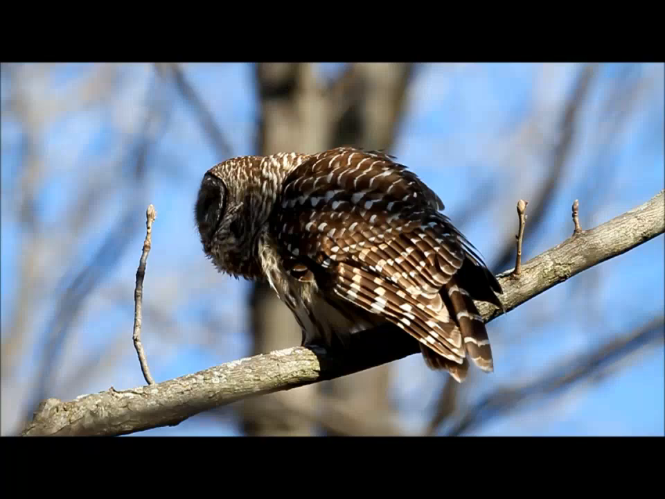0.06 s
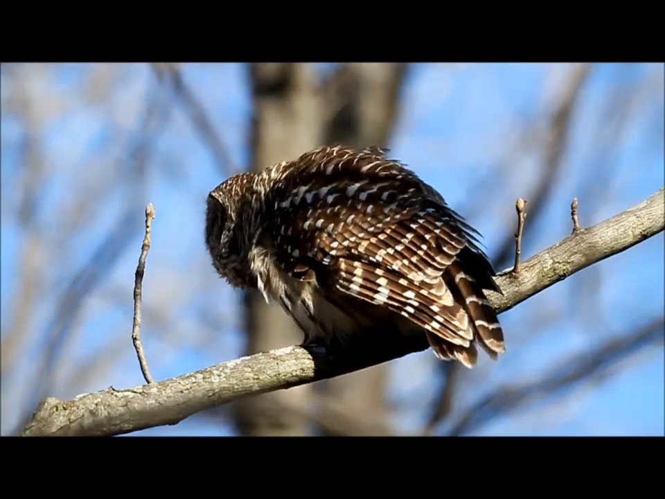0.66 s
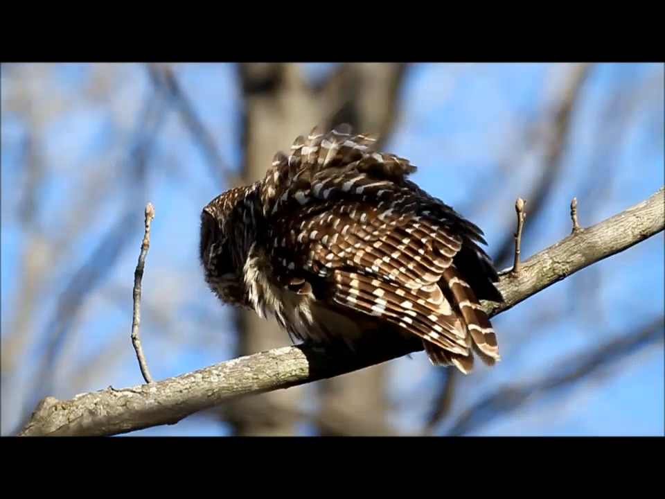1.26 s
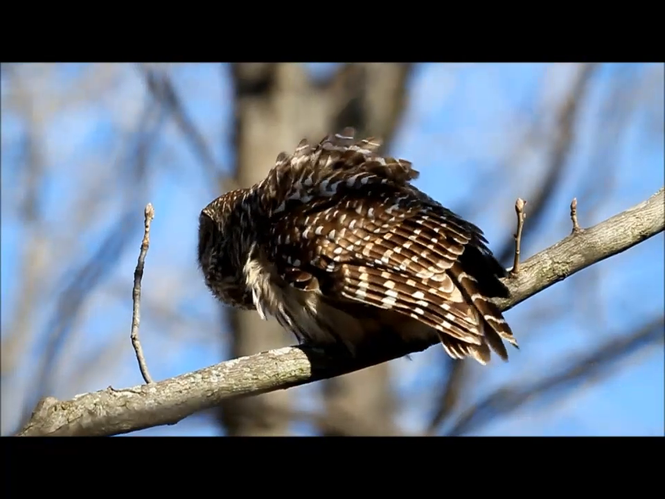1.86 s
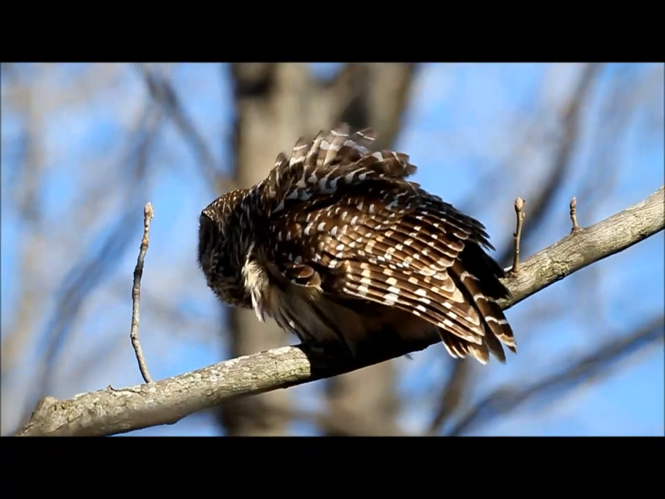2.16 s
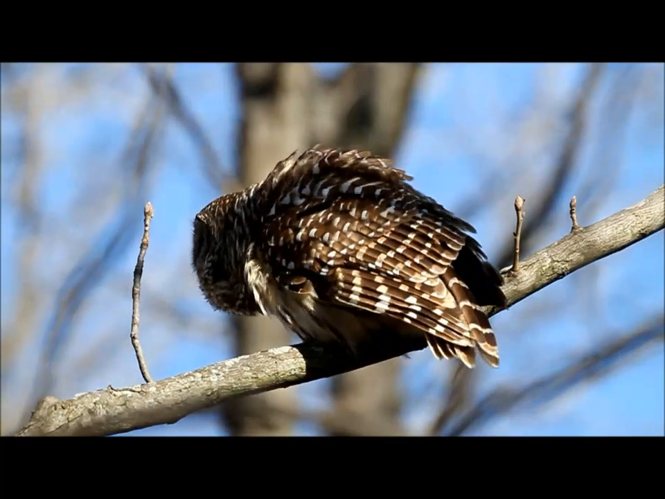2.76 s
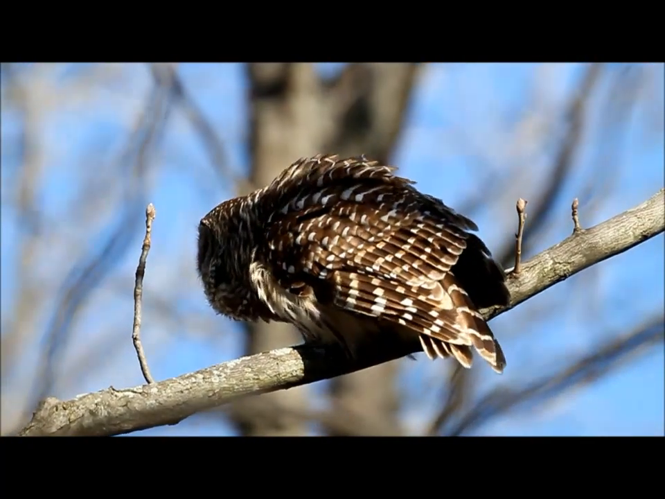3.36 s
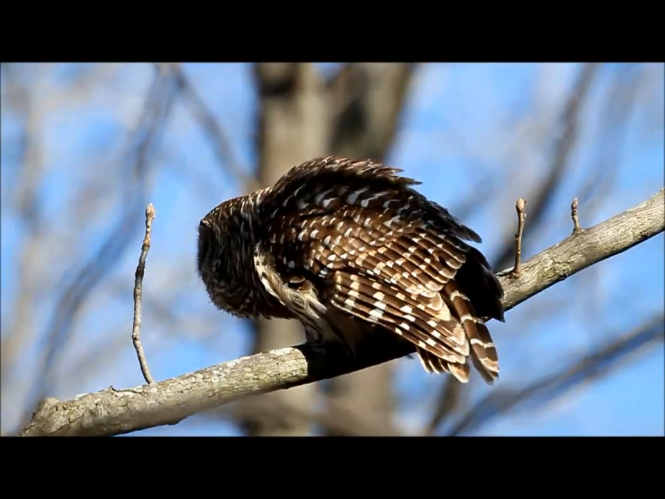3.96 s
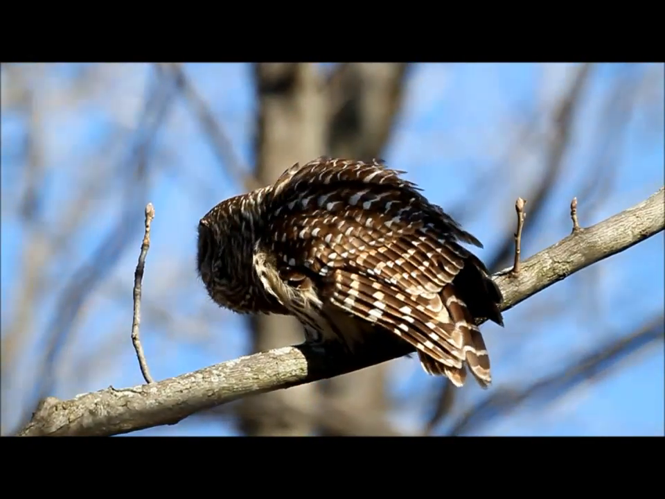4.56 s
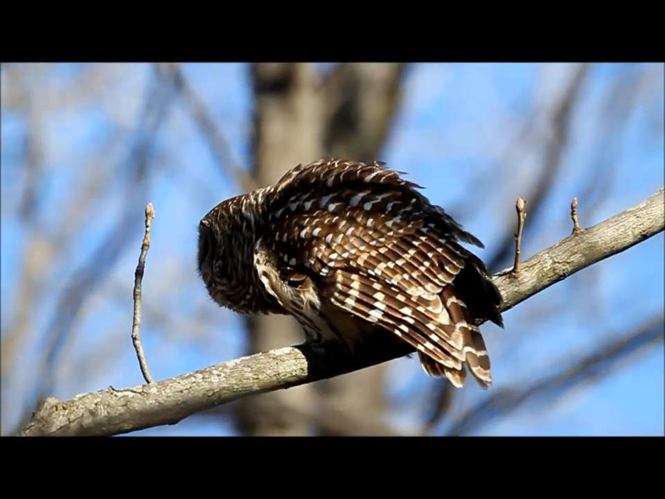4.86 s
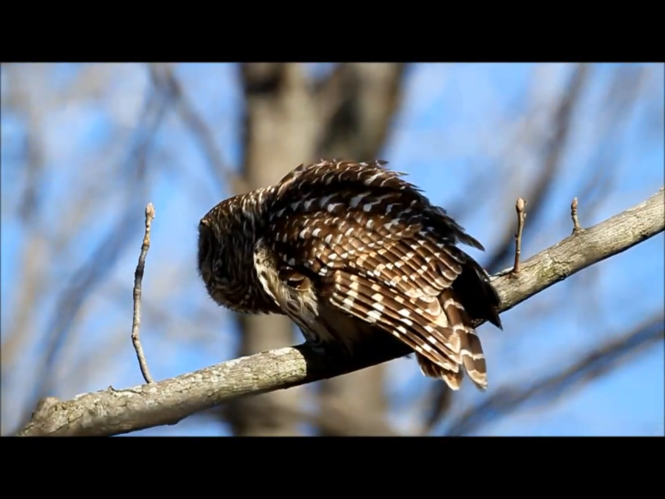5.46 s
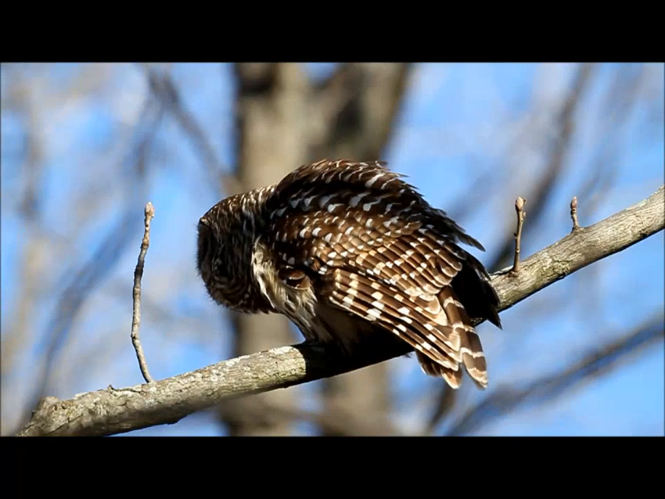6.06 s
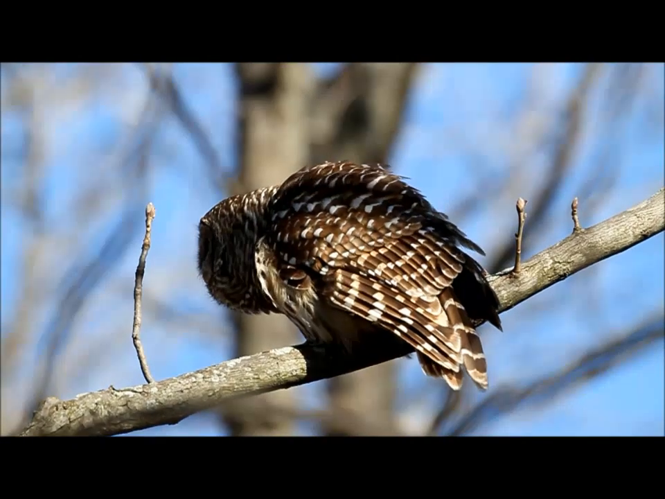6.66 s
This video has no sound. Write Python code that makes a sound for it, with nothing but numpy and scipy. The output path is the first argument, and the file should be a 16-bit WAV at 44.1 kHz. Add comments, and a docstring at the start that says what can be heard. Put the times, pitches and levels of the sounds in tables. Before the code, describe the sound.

A nearby owl hoots in the woods from the very start, giving eight short, arching hoots about 0.4 seconds apart. The first ones are low and slightly hoarse; they climb in pitch and grow clearer and a little louder, levelling off around 2 seconds. Gusts of wind thump and rumble on the microphone through the first 2 seconds, then die down. At about 2.9 seconds, straight after the eighth hoot, the owl holds one long note that rises, starts to quaver and slides down, ending near 3.8 seconds. Each call leaves a short echo among the trees. Small birds give very faint, thin chips and whistles far away, around 1 to 2 seconds, from 4.5 to 5.2 seconds and near 6.3 seconds. A soft, steady outdoor hiss runs underneath, with a few weak wind bumps returning from about 5.3 seconds to the end.

```python
"""Wind thumps on the microphone as a barred owl starts eight hoots that climb in pitch, then a long,
falling, quavering note. Its syrinx membranes sound through the resonances of throat and beak, flipping
into a pure upper register at the top of the higher calls; the ground and bare trunks throw it back.
The gusts die down, and small birds call thinly, far off, over a steady hiss."""
import sys
import numpy as np
from scipy import signal
from scipy.fft import rfft, irfft
from scipy.io import wavfile

SR = 44100
rng = np.random.default_rng(int(sys.argv[2]) if len(sys.argv) > 2 else 0)


def generate_wav(sig):
    """Save sig (samples, or channels by samples) to the path in sys.argv[1] as 16-bit PCM at SR."""
    pcm = np.round(np.clip(np.atleast_2d(sig).T, -1, 1) * 32767).astype(np.int16)
    wavfile.write(sys.argv[1], SR, pcm)


N = 295470
TIME = np.arange(N) / SR
BIN_HZ = np.fft.rfftfreq(N, 1 / SR)


def from_db(db):
    """Decibels to gain."""
    return 10 ** (np.asarray(db) / 20)


def unit_rms(x):
    """Normalise to an rms of 1."""
    return x / np.sqrt(np.mean(x ** 2) + 1e-20)


def drift(rate_hz):
    """A smooth random modulator, rms 1."""
    return unit_rms(irfft(rfft(rng.standard_normal(N)) / (1 + (BIN_HZ / rate_hz) ** 4), N))


def equalise(x, curve):
    """Apply an EQ curve of (frequency [Hz], gain [dB]) points."""
    hz, db = np.transpose(curve)
    return irfft(rfft(x) * from_db(np.interp(np.log(BIN_HZ + 1), np.log(hz), db)), N)


def coloured_noise(curve, low_hz, high_hz):
    """Equalised noise between steep low and high cuts, rms 1."""
    hz = BIN_HZ + 1
    band = 1 / np.sqrt((1 + (low_hz / hz) ** 10) * (1 + (hz / high_hz) ** 20))
    noise = irfft(rfft(rng.standard_normal(N)) * band, N)
    return unit_rms(equalise(noise, curve))


# tone of the woodland murmur and of the hiss: (frequency [Hz], relative level [dB])
MURMUR_EQ = [(12, -44), (20, -4), (59, 0), (119, -15), (207, -17.5), (238, -10.5), (315, -21), (631, -21),
             (881, -23.5), (1770, -27.5), (2030, -27.5), (3000, -26), (3350, -30), (10500, -28.5),
             (15500, -41)]
HISS_EQ = [(880, -48), (1500, -18), (1860, -8.5), (2010, -10), (3030, -2), (3310, -6.5), (10400, -13.5),
           (15500, -21)]
def air(murmur_db=-57, hiss_db=-57.5):
    """The bed: a steady murmur of the woods with a fine hiss on top."""
    murmur = from_db(murmur_db) * coloured_noise(MURMUR_EQ, 192, 1950)
    return murmur + from_db(hiss_db) * coloured_noise(HISS_EQ, 1370, 17000)


def trunk_reverb(x, t60_s, predelay_s=.039, early_db=19, early_s=.046):
    """Echoes from many trunks: the near ones strong, the far ones thickening into a fading wash."""
    t = TIME[:2 * SR]
    echoes_per_s = 500 * (1 + 10 * t)
    taps = rng.standard_normal(len(t)) * (rng.random(len(t)) < echoes_per_s / SR)
    decay_db = -60 * t / t60_s + early_db * np.exp(-t / early_s)
    impulse = taps * (t > predelay_s) * from_db(decay_db)
    return signal.fftconvolve(x, impulse / np.linalg.norm(impulse))[:N]


# short chips and longer whistles: (time [s], length [s], start pitch [Hz], end pitch [Hz], level [dB])
BIRD_CHIPS = [(0.842, 0.039, 6950, 6700, -60), (0.9, 0.027, 6780, 6710, -69),
              (1.655, 0.027, 9970, 8600, -63), (2.04, .045, 7700, 6750, -61),
              (4.696, 0.04, 4140, 3660, -60), (4.755, 0.026, 1785, 1890, -62),
              (5.122, 0.051, 7000, 6730, -60), (5.185, 0.065, 6730, 6720, -71)]
BIRD_WHISTLES = [(1.974, 0.15, 3110, 2900, -60), (4.451, .3, 3114, 3000, -68),
                 (4.613, 0.117, 2995, 2950, -61.5), (6.315, 0.077, 3200, 2840, -60)]
def small_birds(settle=4.11, wobble_depth=.01):
    """Thin, distant tones that slide, mostly downward, and settle on their end pitch."""
    out = np.zeros(N)
    wobble = 1 + wobble_depth * drift(77)
    for start, length, start_hz, end_hz, db in BIRD_CHIPS + BIRD_WHISTLES:
        on = (TIME > start) & (TIME < start + length)
        progress = (TIME[on] - start) / length
        hz = (end_hz + (start_hz - end_hz) * np.exp(-settle * progress)) * wobble[on]
        envelope = from_db(db) * np.sqrt(2) * np.sin(np.pi * progress)
        out[on] += envelope * np.sin(2 * np.pi * np.cumsum(hz) / SR)
    return out


# gusts on the microphone: (time [s], hold [s], strength [dB])
GUST_CUES = [(.07, 0.21, -31), (0.353, .12, -27), (.49, 0.075, -31.5), (0.679, 0.088, -38.5),
             (0.802, 0.086, -28), (0.987, 0.041, -32), (1.093, .19, -29.5), (1.469, 0.26, -28.5),
             (1.786, 0.21, -40.5), (2.0, 0.32, -46.5), (2.69, .35, -50.5), (5.273, 0.58, -52.5)]
def gust_envelope(rise_db_per_s=480, fall_db_per_s=312, calm_db=-54.5):
    """Wind strength in dB: each gust rises quickly, holds and dies back to the calm."""
    level_db = np.full(N, calm_db)
    for start, hold, db in GUST_CUES:
        fade_in_db = rise_db_per_s * np.maximum(start - TIME, 0)
        fade_out_db = fall_db_per_s * np.maximum(TIME - start - hold, 0)
        level_db = np.maximum(level_db, db - fade_in_db - fade_out_db)
    return level_db


def lesser_eddies(gust_db, per_s=14, over_gust_db=6, centre_hz=105, spread_octaves=.62):
    """Cues for random thumps, as strong as the gust that carries them."""
    born = rng.random(N) < per_s / SR
    octaves = spread_octaves * np.tanh(rng.standard_normal(N)[born])
    return list(zip(TIME[born], gust_db[born] + over_gust_db, centre_hz * 2 ** octaves))


# the hardest hits of the wind: (time [s], pre-filter peak [dB], pitch [Hz])
STRONG_EDDIES = [(.102, -19.5, 147), (.15, -16.5, 155), (.204, -8.5, 88), (.252, -14, 105),
                 (.366, -16.5, 226), (.381, -10.5, 84), (.438, -11.5, 159), (.452, -13.5, 150),
                 (.519, -19, 149), (.574, -23, 137), (.693, -23.5, 71), (.808, -21, 176), (1.045, -24, 154),
                 (1.083, -13.5, 121), (1.098, -11, 115), (1.152, -14.5, 90), (1.174, -15.5, 187),
                 (1.24, -15.5, 134), (1.274, -16.5, 133), (1.517, -10.5, 91), (1.722, -13.5, 107),
                 (1.93, -21, 119), (2.33, -29, 90), (2.885, -31.5, 84.5), (3.03, -31, 79),
                 (5.289, -28.5, 89.5), (5.389, -31, 89), (5.75, -34.5, 79.5), (6.34, -30, 56)]
def eddy_thumps(gust_db, attack_s=.003126):
    """Each eddy shoves the microphone's diaphragm for a cycle or two."""
    out = np.zeros(N)
    for start, db, hz in list(STRONG_EDDIES) + lesser_eddies(gust_db):
        on = (TIME > start) & (TIME < start + .06)
        t = TIME[on] - start
        envelope = from_db(db) * t / attack_s * np.exp(1 - t / attack_s)
        out[on] += envelope * np.sin(2 * np.pi * (hz * t + rng.random()))
    return out


# tone of the gusts' rumble: (frequency [Hz], relative level [dB])
RUMBLE_EQ = [(12, -53), (20, -28), (38, 0.5), (76, 5), (113, -1), (141, -1.5), (232, -14), (312, -32),
             (450, -35), (580, -71), (990, -120)]
def wind(rumble_trim_db=-.5, lumpy_db=2.5, breeze_db=-58, band_hz=(72, 650)):
    """Lumpy rumble and thumps ride the gusts, over a deep breeze that never stops."""
    gust_db = gust_envelope()
    rumble_db = gust_db + rumble_trim_db + lumpy_db * drift(25.5)
    rumble = from_db(rumble_db) * coloured_noise(RUMBLE_EQ, 22, 504.5)
    breeze = from_db(breeze_db + lumpy_db * drift(14)) * coloured_noise(MURMUR_EQ, 26, 77)
    bandpass = signal.butter(2, band_hz, "band", fs=SR, output="sos")
    return breeze + signal.sosfilt(bandpass, rumble + eddy_thumps(gust_db))


# tone of the owl's reverb send: (frequency [Hz], gain [dB])
TRUNK_EQ = [(250, -14), (450, 5.5), (545, 6), (585, 3), (680, 4), (800, -6.5), (1050, -7.5), (1600, -9),
            (2200, -3.5), (3500, -21)]
def owl_reverb(calls):
    """The trunks return mostly the fundamental, which spreads all round the bird."""
    return from_db(-4) * trunk_reverb(equalise(calls, TRUNK_EQ), t60_s=1.33)


# tone of the ground bounce, strongest near 450 Hz: (frequency [Hz], gain [dB])
GROUND_EQ = [(250, -41), (450, 9), (600, -3.5), (800, -8), (1100, -14.5), (2400, -7)]
def ground_echo(calls, delay_s=.0155):
    """One bounce off the ground: as the pitch glides, it boosts and thins the fundamental in turn."""
    return np.interp(TIME - delay_s, TIME, equalise(calls, GROUND_EQ), left=0)


# throat and beak resonances: (frequency [Hz], width [Hz], gain [dB])
FORMANTS = [(340, 290, -16.5), (581.6, 153, -5.5), (819, 159, -5.5), (1019, 133, -7), (1212, 110, -14),
            (1572, 148, -13.5), (1867, 86, -20.5), (2161, 160, -15.5), (2294.1, 45, -15.5),
            (3440, 350, -31)]
def throat(hz, notch_hz=1175, notch_width_hz=55, notch_db=-13, leak_db=-46, leak_hz=3000):
    """Gain of the throat: steep-sided resonances, one antiresonance and a faint leak."""
    peaks = sum(from_db(db) / (1 + 2 * ((hz - centre) / width) ** 2) ** 2
                for centre, width, db in FORMANTS)
    notch = from_db(notch_db * np.exp(-((hz - notch_hz) / notch_width_hz) ** 2))
    return peaks * notch + from_db(leak_db) / (1 + (hz / leak_hz) ** 6)


def chest_db(pitch, boost_db=8.5, below_hz=292, knee_hz=21):
    """Lift on the fundamental: the lowest pitches have more body."""
    return .5 + boost_db * (.5 + .5 * np.tanh((below_hz - pitch) / knee_hz))


FLIP_HZ, FLIP_RATIO, FLIP_KNEE_HZ = 423, 1.18, 4   # past FLIP_HZ the pitch jumps up by FLIP_RATIO
def syrinx(pitch, drive_db, fundamental_db=0, jitter=.003, rasp=.009, shimmer=.1, bright_hz=378):
    """Membrane harmonics through the throat: dull and a little hoarse when low, clean once flipped up."""
    upper = .5 + .5 * np.tanh((pitch - FLIP_HZ) / FLIP_KNEE_HZ)   # register crossfade, 0 to 1
    lowpass = signal.butter(2, 130, fs=SR, output="sos")
    flutter, tremble = [unit_rms(signal.sosfilt(lowpass, noise))
                        for noise in rng.standard_normal((2, len(pitch)))]
    hz = pitch * (1 + (FLIP_RATIO - 1) * upper)
    roughness = jitter * upper + rasp * (1 - upper)
    phase = 2 * np.pi * np.cumsum(hz * (1 + roughness * flutter)) / SR
    tilt_db_per_octave = -1.5 - 5 * np.maximum(np.log2(bright_hz / pitch), 0)
    voice = from_db(chest_db(pitch) + fundamental_db) * throat(hz) * np.sin(phase)
    for k in range(2, 13):
        voice += from_db(tilt_db_per_octave * np.log2(k)) * throat(k * hz) * np.sin(k * phase)
    return np.sqrt(2) * from_db(drive_db) * voice * (1 + shimmer * (1 - upper) * tremble)


HALF_HOOT_S = .1   # this and the times in the next two functions describe an unstretched hoot
def hoot_bend(t, rise_depth=.48, fall_depth=.54, fall_s=.062):
    """Pitch as a share of the top at t = 0: it climbs, tips over and settles low."""
    rise = rise_depth * np.abs(t / HALF_HOOT_S) ** 1.42
    fall = fall_depth * (1 - np.exp(-np.abs(t / fall_s) ** 2.8))
    return 1 - np.where(t < 0, rise, fall)


def hoot_envelope(t, attack_s=.035, release_s=.023, fade_db=16, sag_db_per_s=34):
    """The push behind a hoot in dB: quick attack, sagging hold, release."""
    attack = np.maximum(1 - (HALF_HOOT_S + t) / attack_s, 0)
    release = np.maximum(1 - (HALF_HOOT_S - t) / release_s, 0)
    return -fade_db * (attack + release) - sag_db_per_s * np.maximum(t, 0)


# the eight hoots: (time of the top [s], top pitch before the flip [Hz], stretch [ratio], drive [dB])
HOOT_CUES = [(.022, 346, 0.77, -31.5), (.423, 399.6, 0.88, -32), (.822, 445.7, 0.9, -31),
             (1.217, 461.7, 0.96, -30), (1.609, 473.7, 0.98, -29), (2.0, 479.5, 0.99, -28.5),
             (2.393, 478.4, 1.0, -28.5), (2.777, 475.4, 0.98, -29)]
def hoots():
    """Each hoot is the same arch of pitch and effort, pushed higher as the series builds."""
    out = np.zeros(N)
    for top_s, top_hz, stretch, db in HOOT_CUES:
        t = (TIME - top_s) / stretch
        on = np.abs(t) < HALF_HOOT_S
        out[on] += syrinx(top_hz * hoot_bend(t[on]), db + hoot_envelope(t[on]))
    return out


# the long note's glide: (time [s], pitch before the flip [Hz])
LONG_GLIDE = [(2.86, 250), (2.9, 360), (2.955, 476), (3.05, 492), (3.118, 491), (3.135, 474), (3.236, 438),
              (3.248, 407), (3.29, 386), (3.635, 297), (3.78, 220)]
# the push behind it: (time [s], drive [dB])
LONG_DRIVE = [(2.86, -47), (2.885, -31), (3.085, -24), (3.15, -28), (3.39, -28), (3.6, -33), (3.74, -36),
              (3.78, -51)]
def long_note(quaver_start_s=3.122, quaver_hz=18.5, vibrato_hz=6.5, tremolo_db=.5):
    """The last note starts to quaver in pitch and strength, leaves the upper register and sinks away."""
    out = np.zeros(N)
    on = (TIME > LONG_GLIDE[0][0]) & (TIME < LONG_GLIDE[-1][0])
    t = TIME[on]
    quaver = -np.sin(2 * np.pi * quaver_hz * np.maximum(t - quaver_start_s, 0))
    pitch = np.interp(t, *np.transpose(LONG_GLIDE)) + vibrato_hz * quaver
    drive_db = np.interp(t, *np.transpose(LONG_DRIVE)) + tremolo_db * quaver
    out[on] = syrinx(pitch, drive_db, fundamental_db=-1.5)
    return out


# a dip and a swell in the long note's low band: (time [s], half-width [s], gain [dB])
LOW_BAND_MOVES = [(3.148, .018, -21), (3.215, 0.0156, 3.5)]
def waver(x, crossover_hz=780):
    """The fundamental ducks briefly and swells back while the overtones carry on."""
    low_band = irfft(rfft(x) / (1 + (BIN_HZ / crossover_hz) ** 20), N)
    gain_db = sum(db * np.exp(-((TIME - at) / width) ** 2) for at, width, db in LOW_BAND_MOVES)
    return x + low_band * (from_db(gain_db) - 1)


def scene():
    """The mono mix: air and wind, small birds deep among the trees, the owl up front."""
    series, held, birds = hoots(), long_note(), small_birds()
    calls = series + held
    reverb_send = from_db(.5) * series + held
    owl = waver(calls + ground_echo(calls) + owl_reverb(reverb_send))
    far_birds = birds + from_db(-4.5) * trunk_reverb(birds, t60_s=.31)
    return (air() + wind() + far_birds + owl)[None]


def record(dry, cutoff_hz=15700):
    """A steep high cut on the master."""
    return signal.sosfilt(signal.ellip(12, .1, 80, cutoff_hz, fs=SR, output="sos"), dry)


dry = scene()
out = record(dry)
generate_wav(out)
```